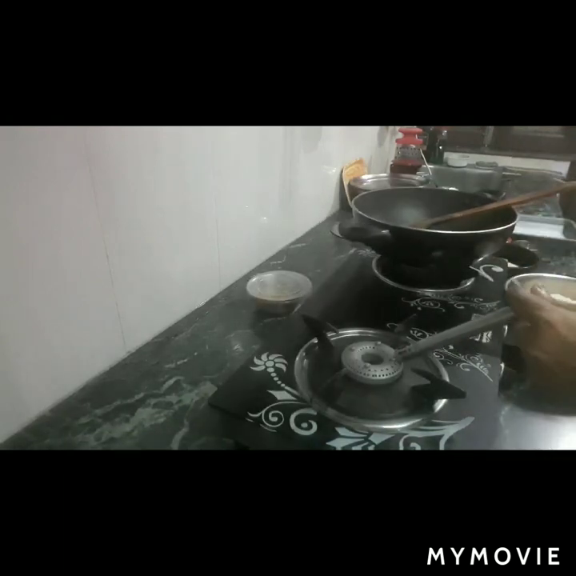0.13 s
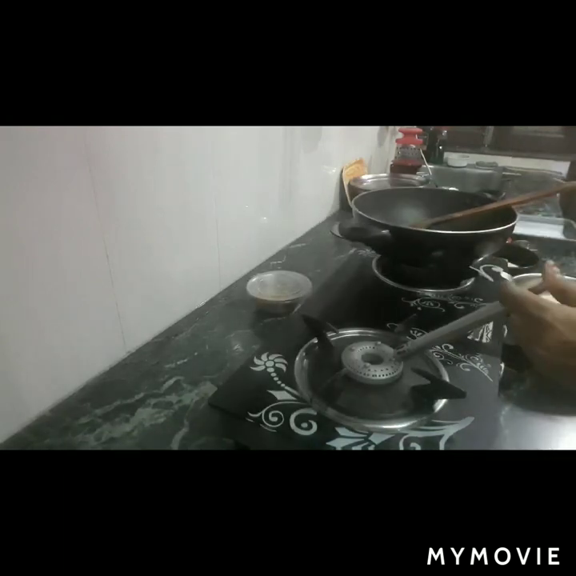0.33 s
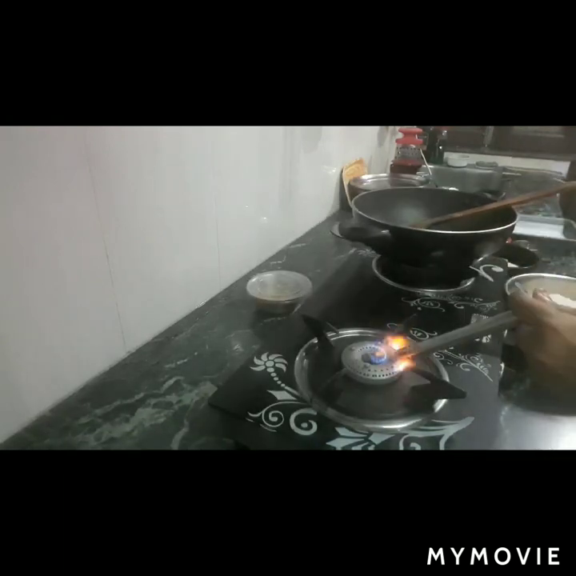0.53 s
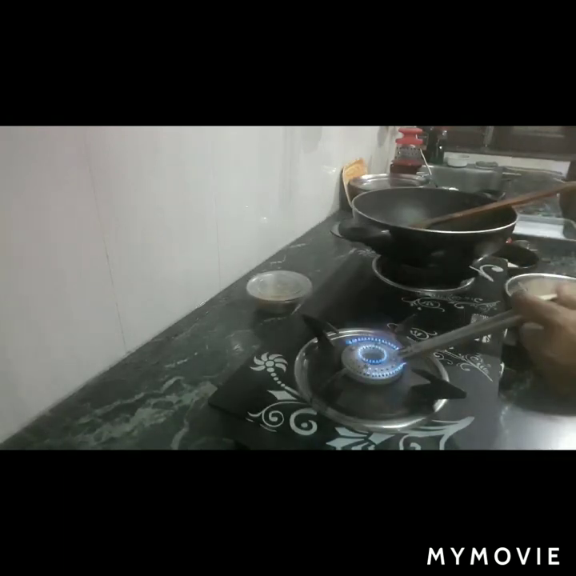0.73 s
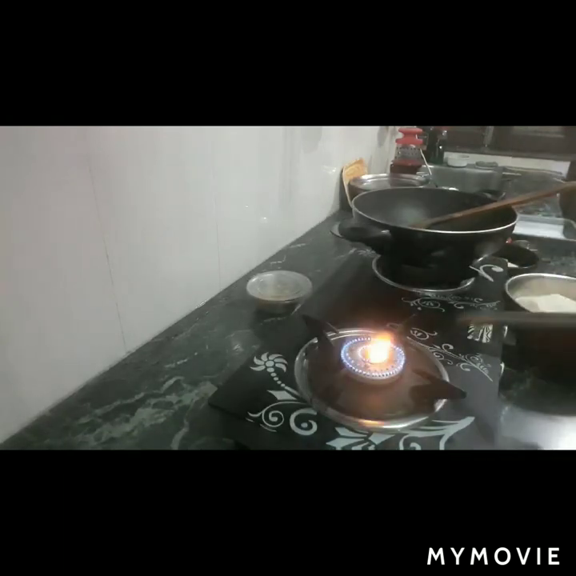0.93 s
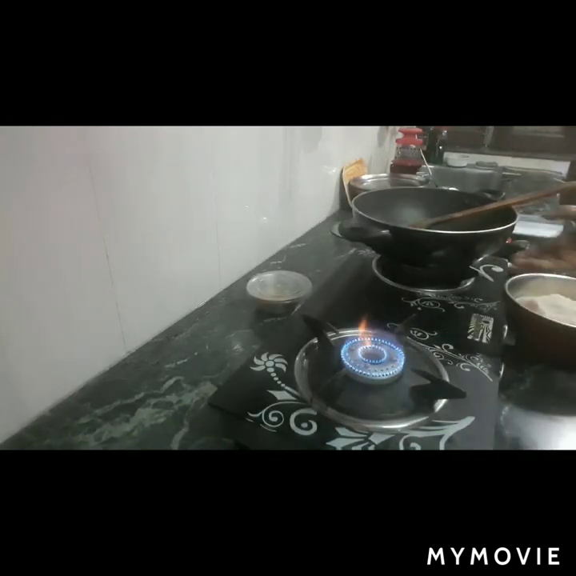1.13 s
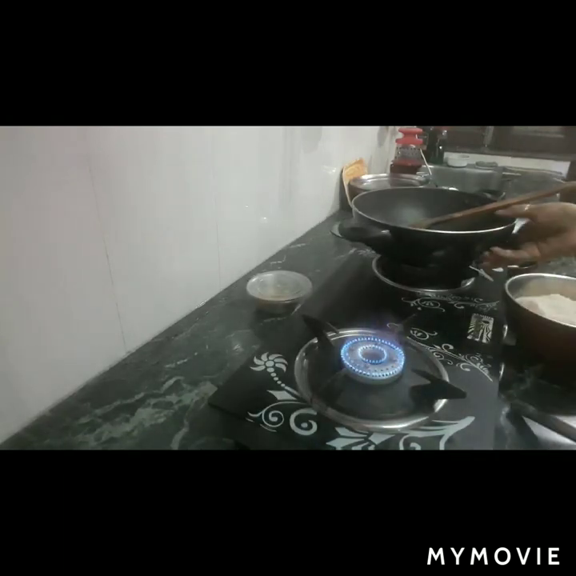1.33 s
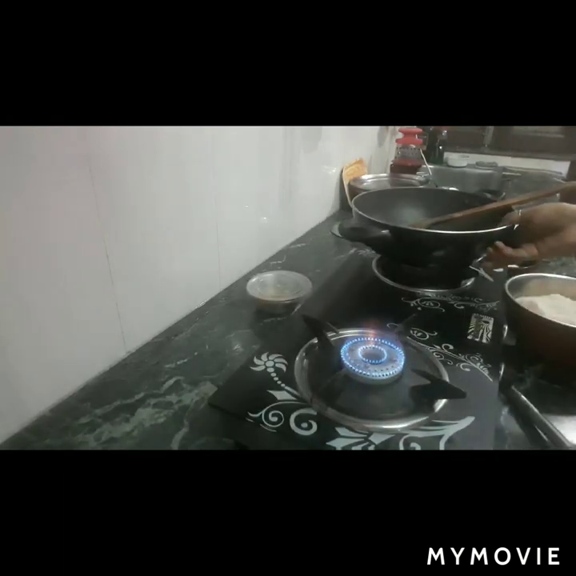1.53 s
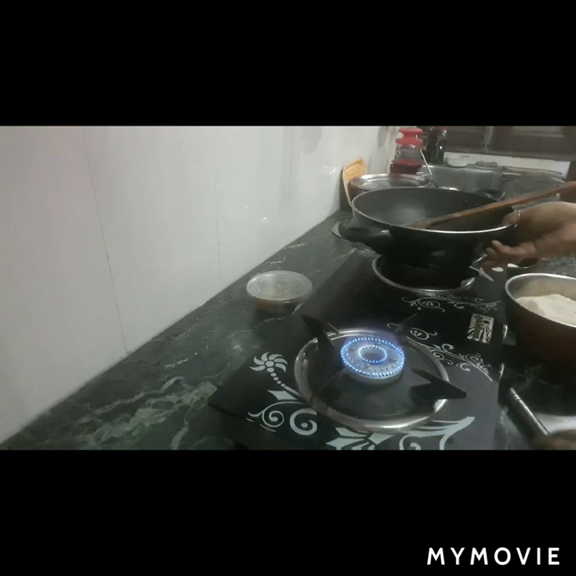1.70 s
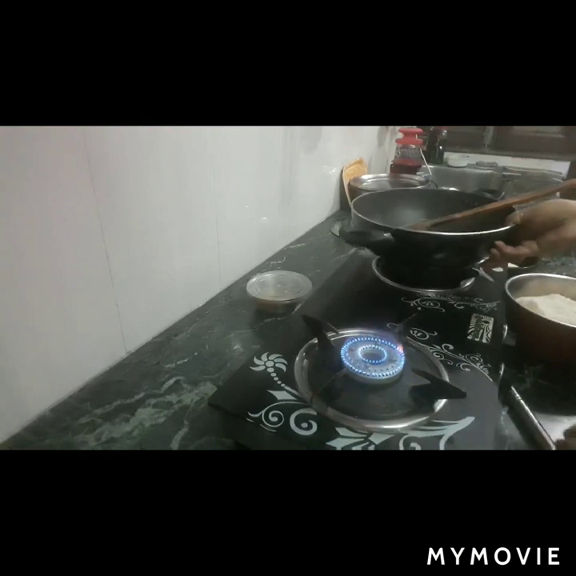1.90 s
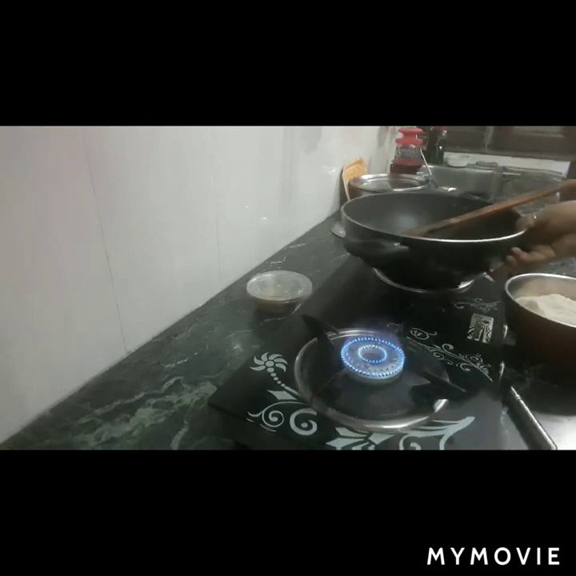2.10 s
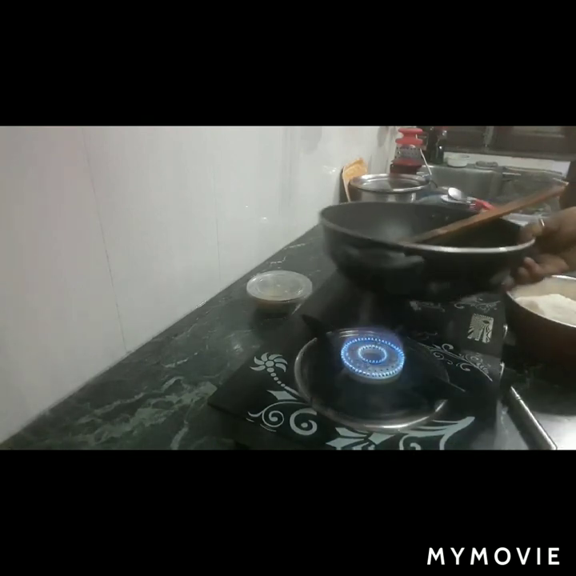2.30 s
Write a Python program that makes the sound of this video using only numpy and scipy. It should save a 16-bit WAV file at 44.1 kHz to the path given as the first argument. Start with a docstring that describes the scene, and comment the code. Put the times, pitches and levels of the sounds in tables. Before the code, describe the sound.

A lighter snaps at a gas stove, the flame catches, then a metal pan clanks.

```python
"""Lighting a gas stove

In a small, hard-walled kitchen, over hiss and a low drone, a spark lighter snaps twice against the burner
and the gas catches with a soft flutter. The lighter is laid on the stone counter; a metal pan clanks and
scrapes on the grate as it is lifted. Each blow is a short rattle that rings metal and thuds below it."""
import sys
import numpy as np
from scipy import signal
from scipy.fft import rfft, irfft
from scipy.io import wavfile
from scipy.ndimage import uniform_filter1d

SR = 44100
rng = np.random.default_rng(int(sys.argv[2]) if len(sys.argv) > 2 else 0)


def put_to_file(sound):
    """Save the sound as 16-bit audio at rate SR, in the file named by the first command-line argument."""
    columns = np.atleast_2d(sound).T  # one column per channel
    safe = np.clip(columns, -1, 1)
    whole_steps = np.round(safe * 32767)
    wavfile.write(sys.argv[1], SR, whole_steps.astype(np.int16))


N = 103635

# low modes of the stove top (frequency [Hz], level [dB], t60 [s])
STOVE_TOP_MODES = [(108.5, -43, 0.7), (292, -76, 0.23), (420, -72, 0.21)]
# spectrum of pan on grate (frequency [Hz], level [dB])
PAN_COLOUR = [(40, -30), (150, -9), (350, -1), (650, -2.5), (1300, 0), (1900, 4), (2700, 0.5), (3600, 8),
              (4400, 1), (5600, 4), (6500, -0.5), (7200, 7), (8200, -2.5), (8900, -12.5), (10000, -7.5),
              (11200, -1.5), (12600, -9), (15500, -11)]
PAN_WET_DB = -4


def amp(db):
    """Decibels to gain."""
    return 10 ** (np.asarray(db) / 20)


def unit_rms(x):
    """Scale to rms 1."""
    return x / np.sqrt(np.mean(x ** 2) + 1e-20)


def log_interp(points, hz):
    """Read a table on a log-frequency axis."""
    knots_hz, values = np.transpose(points)
    return np.interp(np.log(hz + 1), np.log(knots_hz + 1), values)


def envelope(points):
    """Gain curve from (time [s], level [dB]) points."""
    return amp(np.interp(np.arange(N) / SR, *np.transpose(points)))


def add(mix, start_s, sound):
    """Mix a sound in at start_s."""
    part = mix[round(start_s * SR):][:len(sound)]
    part += sound[:len(part)]


def coloured(x, colour, tilt_db_oct=0, size=4096):
    """Minimum-phase filter with the given spectrum, tilted about 3 kHz."""
    hz = np.fft.rfftfreq(size, 1 / SR)
    octaves = np.log2(np.maximum(hz, 300) / 3000)
    gain = amp(log_interp(colour, hz) + tilt_db_oct * octaves)
    cepstrum = irfft(np.log(gain))
    cepstrum[1:size // 2] *= 2
    cepstrum[size // 2 + 1:] = 0
    response = irfft(np.exp(rfft(cepstrum)))
    return signal.fftconvolve(x, response)[:len(x)]


def swell(x, length_s):
    """The start of x under a half-sine rise and fall."""
    n = round(length_s * SR)
    return x[:n] * np.sin(np.pi * np.arange(n) / n)


def wavering(hz, drift_rms_hz):
    """Unit-rms tone whose pitch wanders at random."""
    drift = unit_rms(uniform_filter1d(rng.standard_normal(N), size=400))
    return np.sqrt(2) * np.sin(2 * np.pi * np.cumsum(hz + drift_rms_hz * drift) / SR)


def rattle(decay_s, size=4096):
    """Dying burst of micro-contacts: near-flat spectrum, unit energy."""
    fade = np.exp(-np.arange(size) / SR / decay_s)
    x = rng.standard_normal(size) * fade
    for _ in range(5):
        x = irfft(np.exp(1j * np.angle(rfft(x))))  # flatten the spectrum
        local_rms = np.sqrt(abs(uniform_filter1d(x ** 2, size=64)) + 1e-12)
        x = x * fade / local_rms
    return x / np.linalg.norm(x)


def ring(modes):
    """Impulse response of a struck body: a sum of dying sines."""
    t = np.arange(SR // 2) / SR
    return sum(amp(db) * 1000 ** (-t / t60_s) * np.sin(2 * np.pi * hz * t) for hz, db, t60_s in modes)


def kitchen(x, wet_db, rise_s=0.0016):
    """Direct sound, reflections from counter and wall, and a dense tail."""
    # tail decay (frequency [Hz], t60 [s])
    decay = [(100, 0.24), (500, 0.47), (1100, 0.31), (2000, 0.27), (4000, 0.33), (8000, 0.32),
             (15000, 0.24)]
    # tail spectrum (frequency [Hz], level [dB])
    colour = [(100, 0), (500, 0), (900, 3), (1400, -1.5), (2500, 2.5), (5000, 0.5), (8000, -2), (15000, 3)]
    # first reflections (delay [s], gain [linear])
    echoes = [(.0027, 0.36), (0.0117, .3), (0.0155, .2)]
    hz, t, bands = signal.stft(rng.standard_normal(SR), SR, nperseg=256)
    bands *= 1000 ** (-t / log_interp(decay, hz)[:, None])
    tail = signal.istft(bands, SR, nperseg=256)[1]
    tail *= 1 - np.exp(-np.arange(len(tail)) / SR / rise_s)
    response = amp(wet_db) * coloured(tail / np.linalg.norm(tail), colour)
    response[0] += 1
    for delay_s, gain in echoes:
        response[round(delay_s * SR)] += gain
    return signal.fftconvolve(x, response)[:N] / 2


def blows(events, colour, modes, low_modes, wet_db, spot_half_width_hz=190, ripple_db=4.5):
    """Short rattles, coloured by the struck spot, that ring the metal and thud into what lies under it."""
    cracks, rings = np.zeros((2, N))
    metal, body = ring(modes), ring(low_modes)
    hz = np.fft.rfftfreq(4096, 1 / SR)
    knots_hz = np.linspace(0, SR / 2, 80)
    for start_s, db, tilt_db_oct, rattle_s, ring_db, thud_db, spot_hz, boost_db in events:
        contact = amp(db) * rattle(rattle_s)
        ripple = np.interp(hz, knots_hz, rng.uniform(-1, 1, len(knots_hz)))
        resonance_db = boost_db / (1 + ((hz - spot_hz) / spot_half_width_hz) ** 2)
        spectrum_db = log_interp(colour, hz) + resonance_db + ripple_db * ripple
        add(cracks, start_s, coloured(contact, np.c_[hz, spectrum_db], tilt_db_oct))
        response = amp(ring_db) * metal + amp(thud_db) * body
        add(rings, start_s, signal.fftconvolve(contact, response))
    return kitchen(cracks, wet_db) + rings / 2


def room_drone():
    """Low noise of the room, drifting in level."""
    # drone spectrum (frequency [Hz], level [dB])
    colour = [(25, -55), (60, -20), (105, -15), (170, -11.5), (250, -6.5), (315, -1), (420, -12),
              (800, -14.5), (4000, -36)]
    # drone envelope (time [s], level [dB])
    levels = [(0, -47), (.45, -53), (.8, -58.5), (1.25, -59.5), (1.42, -64), (1.8, -54), (2.08, -58),
              (2.19, -50.5), (2.35, -57)]
    return envelope(levels) * unit_rms(coloured(rng.standard_normal(N), colour))


def hiss():
    """Broad noise of gas and kitchen, drifting in level."""
    # hiss spectrum (frequency [Hz], level [dB])
    colour = [(25, -35), (80, -1), (200, -18), (500, 2), (1200, 2.5), (2200, -3), (4000, -6), (7200, -12.5),
              (8700, -31.5), (9700, -29.5), (10800, -18), (13000, -28), (15500, -29)]
    # hiss envelope (time [s], level [dB])
    levels = [(0, -48.5), (.22, -47), (.42, -48.5), (.56, -54.5), (.9, -57), (1.1, -61), (1.42, -60.5),
              (1.7, -60.5), (2.0, -47), (2.2, -56), (2.35, -53.5)]
    return envelope(levels) * unit_rms(coloured(rng.standard_normal(N), colour))


def flame(hum_hz=99.8, rush_db=-2.5):
    """Gas catches in a few flares, each a wavering hum plus a low rush."""
    # flares (start [s], length [s], level [dB])
    flares = [(.68, 0.079, -41), (.74, 0.19, -55.5), (.93, .13, -56), (1.03, 0.11, -60)]
    # rush spectrum (frequency [Hz], level [dB])
    colour = [(30, -22), (70, -25), (150, 16), (220, -15), (500, -29), (2000, -66), (16000, -67)]
    out = np.zeros(N)
    for start_s, length_s, db in flares:
        hum = wavering(hum_hz, drift_rms_hz=8)
        rush = amp(rush_db) * unit_rms(coloured(rng.standard_normal(N), colour))
        add(out, start_s, amp(db) * swell(hum + rush, length_s))
    return out


def pan_scrapes(slips_per_s=2400, spread_db=9):
    """The pan slides on the grate in tiny random slips, with a squeak."""
    # slides (start [s], length [s], level [dB], squeak pitch [Hz], squeak level [dB])
    slides = [(1.915, 0.073, -35, 830, -48), (1.972, 0.037, -40, 1328, -39.5),
              (2.037, 0.027, -47.5, 2226, -43)]
    out = np.zeros(N)
    for start_s, length_s, db, squeak_hz, squeak_db in slides:
        slipping = rng.random(N) < slips_per_s / SR
        slips = slipping * rng.standard_normal(N) * amp(spread_db * rng.random(N))
        friction = amp(db) * unit_rms(coloured(slips, PAN_COLOUR, tilt_db_oct=-1.2))
        squeak = amp(squeak_db) * wavering(squeak_hz, drift_rms_hz=11.5)
        add(out, start_s, swell(friction + squeak, length_s))
    return kitchen(out, PAN_WET_DB)


def pan_clanks():
    """The pan strikes the grate and rings; the stove top booms."""
    # clanks (time [s], level [dB], tilt [dB/oct], rattle [s], ring [dB], thud [dB], spot [Hz], boost [dB])
    clanks = [(1.7145, 0, 1.4, 0.0013, -11.5, -39, 3330, 1.5),
              (1.8066, 7.5, -0.2, 0.0067, -9.5, -7, 3900, 4),
              (1.8166, 4.5, 3.5, 0.0043, -29, -8, 6090, 12.5),
              (1.8685, 6.5, 0.3, 0.0045, -19, -5, 6950, 9.5),
              (1.8865, 0, 3.5, 0.0026, -5.5, -2, 11040, 8.5), (1.9112, 1.5, 0, 0.0045, -11, -4, 4700, 8),
              (1.9555, -10.5, -2, 0.0066, -1, -14, 3950, 8),
              (2.0330, -16, -0.5, 0.0089, 0.5, -10, 4020, 9.5)]
    # pan modes (frequency [Hz], level [dB], t60 [s])
    pan_modes = [(890, -39, 0.083), (1235, -32, 0.23), (2240, -47, 0.18), (2825, -28, 0.1),
                 (3170, -38, 0.36), (3670, -46, 0.089), (3925, -48, 0.11), (4795, -58, .2),
                 (4890, -29, 0.14), (5300, -43, 0.19), (5970, -25, 0.068), (7560, -34, 0.15),
                 (6600, -34, 0.18), (10960, -53, 0.17)]
    return blows(clanks, PAN_COLOUR, pan_modes, STOVE_TOP_MODES, PAN_WET_DB)


def lighter_laid_down():
    """The lighter knocks on the counter; its tube rings and the stove top beside it booms."""
    # knocks (time [s], level [dB], tilt [dB/oct], rattle [s], ring [dB], thud [dB], spot [Hz], boost [dB])
    knocks = [(1.4552, -7.5, -2, 0.0033, -7, -6, 740, 5.5), (1.4928, -10, -2, .004, 0.5, -12, 3345, 2.5),
              (1.510, -16, -4.5, 0.0084, -4, 6, 3300, 6), (1.522, -18.5, 4.5, .005, 2, -10, 3345, 6)]
    # knock spectrum (frequency [Hz], level [dB])
    colour = [(40, -33), (200, -0.5), (650, -0.5), (1100, 5), (1800, -6), (2500, -12), (5500, -6.5),
              (7300, -19), (8800, -22), (15000, -27)]
    # tube modes (frequency [Hz], level [dB], t60 [s])
    tube_modes = [(675, -30, 0.14), (1733, -31, 0.04), (3296, -26.5, 0.049), (5000, -45, 0.04),
                  (7170, -41, 0.072), (10300, -62, 0.11)]
    return blows(knocks, colour, tube_modes, STOVE_TOP_MODES, wet_db=-3)


def lighter_strikes():
    """Two snaps against the burner amid small trigger clicks; all thud into the stove's body."""
    # two snaps, the first held for about 30 ms by closely overlapping bursts; trigger clicks
    # (time [s], level [dB], tilt [dB/oct], rattle [s], ring [dB], thud [dB], spot [Hz], boost [dB])
    snaps = [(.2384, 16.5, 0.5, 0.01, -9.5, -10.5, 7370, 10.5),
             (.2470, 4.5, 0.2, 0.014, 1.5, -12.5, 4130, 18), (.2590, 14, 1, 0.011, -0.5, -5, 1580, 8.5),
             (.2715, -4, 6.5, 0.011, -22.5, 4, 11800, 1), (.6727, 14, 1, 0.0069, -6.5, -9, 3290, 5)]
    clicks = [(0.0498, -12.5, -5.5, 0.012, -17, -7, 3730, 4.1), (.393, -1, 0.1, 0.0049, -17, -9.5, 4940, 5),
              (.4660, -21, 2, 0.0047, -12, -10, 11900, 6), (.469, -12.5, -0.5, 0.0079, -2.5, -6, 1770, 20),
              (.603, -8, -5.8, 0.0082, -23.5, -25, 1020, 6.5), (.610, -3, -1.9, .010, -1, -7, 4960, 7.5),
              (.618, -14, 3.5, .009, 5, -14, 10400, 7.7), (.650, -28.5, -13.5, 0.001, 5, -14, 11900, 8),
              (.833, -5, -1.5, 0.019, -18, -20, 2000, 9.5), (.838, -7.5, -4, 0.0062, -17, 3, 4700, 14),
              (.891, -17.5, 0, .004, -23, -15, 3990, 4.9), (0.915, -27.5, 6, 0.0022, -4, 16, 12000, 7.1)]
    # their spectra (frequency [Hz], level [dB])
    snap_colour = [(30, -35), (120, -17), (400, 1), (800, 5.5), (1200, 2), (2300, 3), (2850, -0.5),
                   (3500, 5.5), (4500, 1), (6400, 2), (7200, 4), (8000, -5), (8900, -6.5), (10000, -4.5),
                   (12000, -3.5), (15500, -10)]
    click_colour = [(30, -27.5), (150, -11.5), (450, -16), (900, 3), (1900, 0), (3600, 4), (5200, 0),
                    (7000, 0), (8800, -15.5), (11500, -7.5), (15500, -15)]
    # modes of lighter and burner; trigger and spring; stove body (frequency [Hz], level [dB], t60 [s])
    burner_modes = [(572, -41.5, 0.29), (866, -37.5, 0.09), (848, -37, 0.47), (867, -35.5, .16),
                    (1395, -44, .14), (1652, -34, 0.22), (1861, -44, 0.38), (2360, -36, .34),
                    (2564, -39, 0.37), (3540, -54.5, .2), (4086, -49, 0.16), (4170, -43, .24),
                    (4986, -39, 0.29), (5582, -57, .2)]
    spring_modes = [(1096, -33, .08), (1890, -31, 0.065), (3460, -31, 0.055), (4980, -30, 0.074),
                    (6650, -36, 0.063), (10700, -39, 0.11), (14300, -41, .07)]
    body_modes = [(104.8, -63, 1), (178, -33, 0.11), (316, -36, .13), (364, -49, 0.36)]
    snapping = blows(snaps, snap_colour, burner_modes, body_modes, wet_db=1)
    clicking = blows(clicks, click_colour, spring_modes, body_modes, wet_db=-4.5)
    return snapping + clicking


def scene():
    """All sources, mono."""
    lighter = lighter_strikes() + lighter_laid_down()
    pan = pan_scrapes() + pan_clanks()
    return (lighter + pan + flame() + hiss() + room_drone())[None]


def record(dry, low_cut_hz=87, band_limit_hz=15780):
    """Microphone bass roll-off, then a steep band limit."""
    highpass = signal.butter(2, low_cut_hz, "highpass", fs=SR, output="sos")
    lowpass = signal.firwin(401, band_limit_hz, window=("kaiser", 8), fs=SR)
    return signal.oaconvolve(signal.sosfilt(highpass, dry), lowpass[None], "same")


dry = scene()
out = record(dry)
put_to_file(out)
```